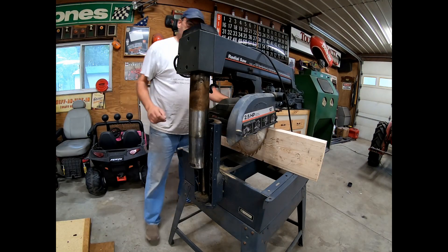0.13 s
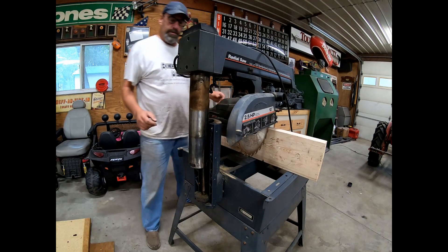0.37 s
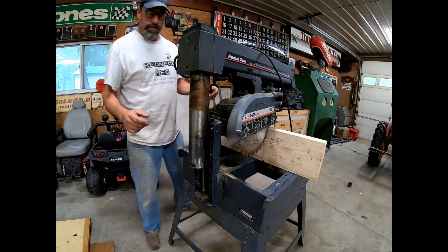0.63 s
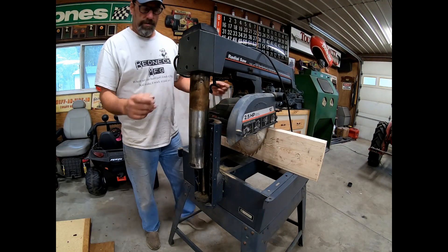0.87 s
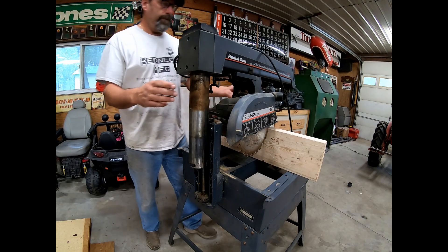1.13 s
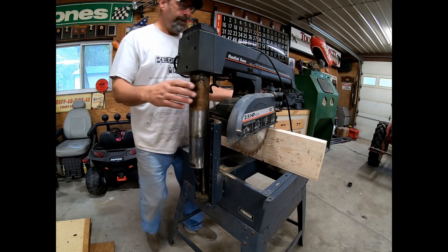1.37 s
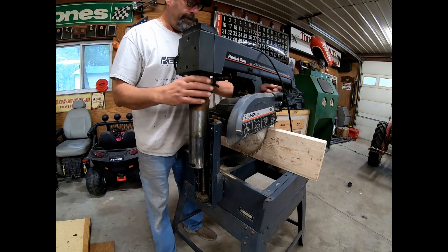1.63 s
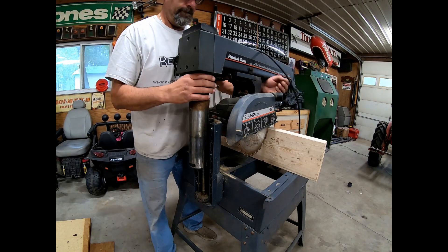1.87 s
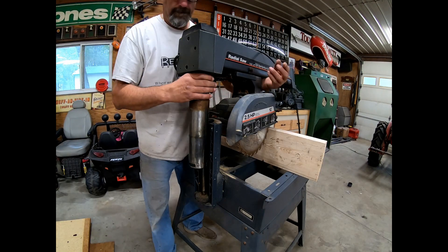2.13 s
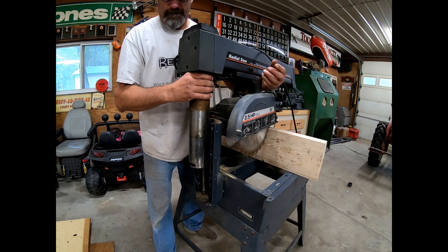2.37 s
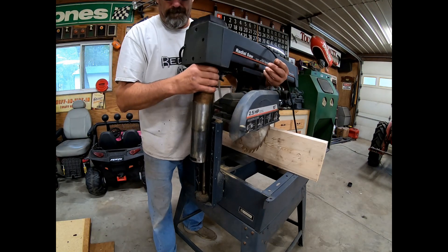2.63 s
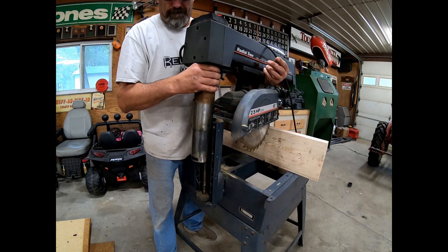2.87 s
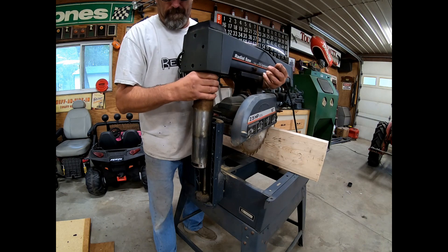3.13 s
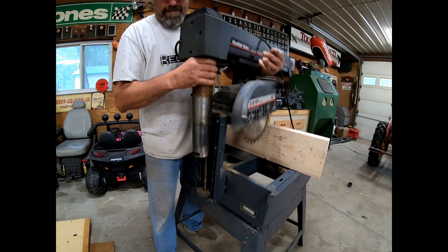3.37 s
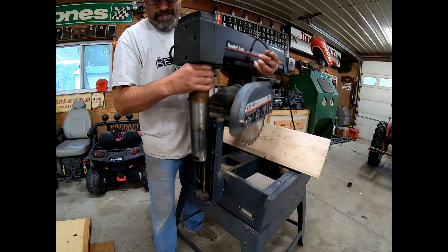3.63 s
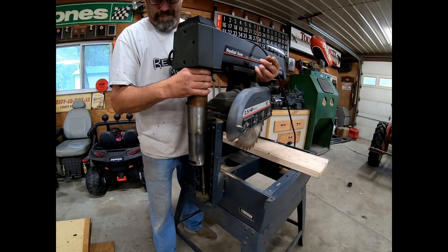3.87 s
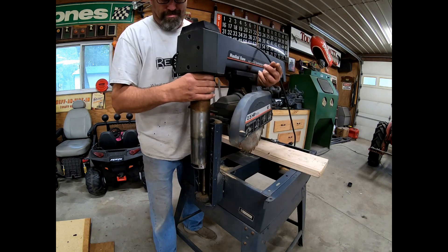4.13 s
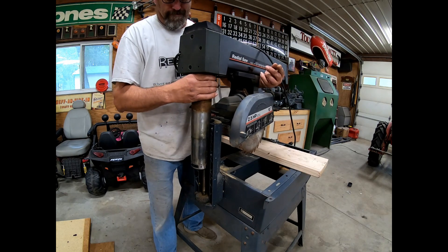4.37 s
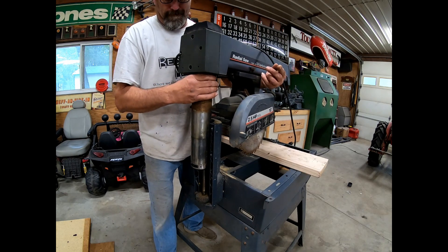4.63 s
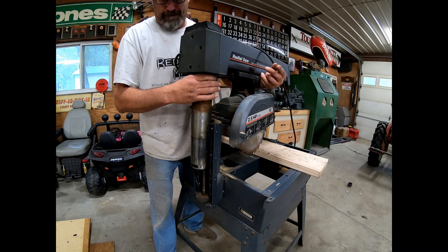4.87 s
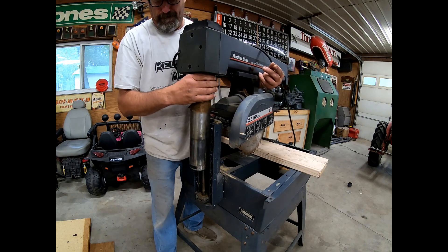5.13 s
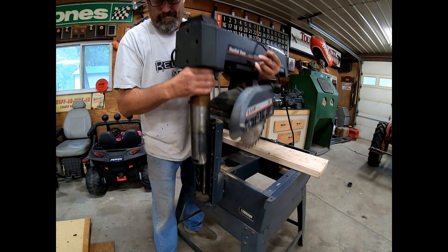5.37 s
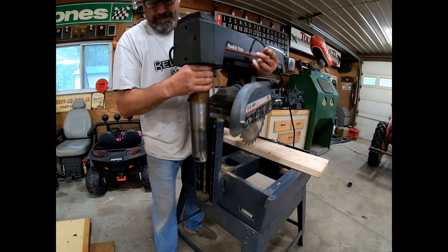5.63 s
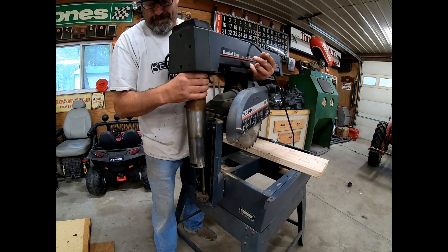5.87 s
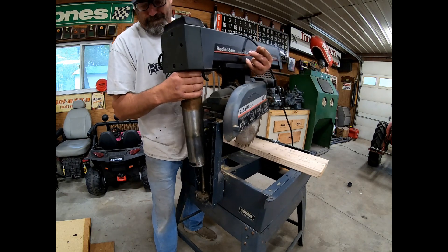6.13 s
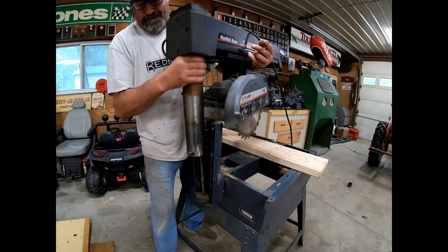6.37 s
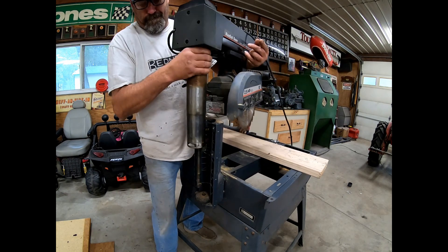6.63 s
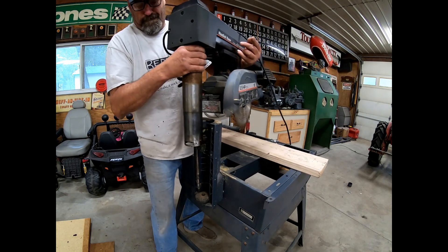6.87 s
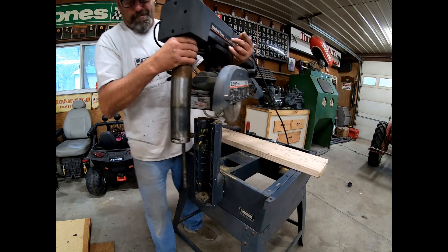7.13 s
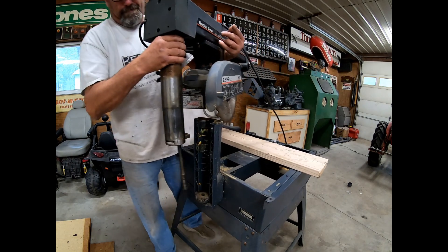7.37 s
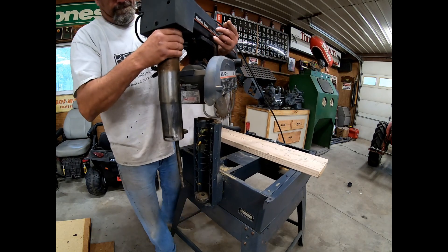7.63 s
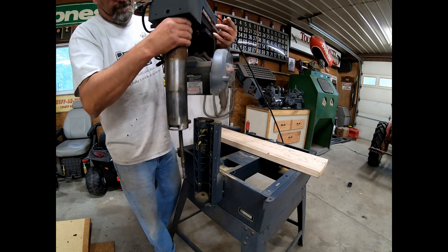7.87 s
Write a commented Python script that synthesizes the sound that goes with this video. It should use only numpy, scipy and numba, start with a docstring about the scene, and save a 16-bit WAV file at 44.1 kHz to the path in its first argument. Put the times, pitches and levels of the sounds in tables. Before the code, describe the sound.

Heavy metal on metal at close range in a big workshop. A small scrape and knock come first, then a lull. Short damped clacks and gritty stick-slip scraping build to a loud bang, with the stand's thin steel booming below. After a second's lull the shoving resumes in irregular jerks, easing into smaller scrapes, a tiny tinkle and a thin blade ring. Garage echo, soft air noise and hum surround it.

```python
"""First a dull scrape and a soft boom of sheet steel, then a knock: a heavy cast saw arm is wrestled off
its column in a large garage, two metres from a small camera. Knocks and scrapes are noise impacts that ring
the cast arm; the stand booms as wobbling tones, and near the end the saw blade rings as decaying sines.
Fading noise makes the garage echo, over steady air noise and a low hum; the camera's gain control turns
down in loud moments and recovers slowly."""
import sys
import numpy as np
from scipy import signal
from scipy.fft import rfft, irfft
from scipy.io import wavfile
from scipy.ndimage import uniform_filter1d
from numba import njit

SR = 44100
rng = np.random.default_rng(int(sys.argv[2]) if len(sys.argv) > 2 else 0)


def bounce(signal):
    """Save signal as a 16-bit WAV file at the path given by the first command-line argument."""
    frames = np.transpose(np.atleast_2d(signal))
    limited = np.clip(frames, -1, 1)
    pcm = np.round(limited * 32767).astype(np.int16)
    wavfile.write(sys.argv[1], SR, pcm)


def field_ratio(decibels):
    """Amplitude ratio for a level in dB (20 dB per decade); scalars and array-likes work."""
    return 10 ** (np.asarray(decibels, dtype=float) / 20)


N = 352800
T = np.arange(N) / SR

# sliding contact, one curve per shove of the arm:
# t/s, scrape level/dB, dull part level/dB re scrape, grit hiss level/dB re scrape
SHOVES = [
    [(0.0, -33, 4, -9), (0.018, -34, 1.5, -11.5), (0.272, -58, 7, -22), (0.282, -55, 4, -10),
     (0.29, -26.5, -12, -10.5), (0.372, -53.5, 9.5, -17), (0.556, -56, -6, -17), (0.6, -56, -11, -17)],
    [(1.35, -66, -8, -9), (1.484, -72, 1, -10), (1.592, -66, -15, -14), (1.642, -48.5, -14, 6),
     (1.694, -59, 3, -9), (1.908, -55.5, 3.5, -16), (2.078, -65, -5, -3), (2.4, -54.5, -2, -26)],
    [(2.48, -63, 16, -13), (2.514, -68, 8, -18), (2.528, -29.5, -9, -36), (2.546, -40, 3, -21),
     (2.74, -37, 5, -12), (2.766, -18.5, -3, -17), (2.796, -27.5, 3.5, -14.5), (3.1, -45, 1, -18)],
    [(3.1, -42, 5, -14), (3.114, -28, 4.5, -16), (3.178, -55, 18, -21), (3.24, -21, 0.5, -18),
     (3.26, -18, -4, -16), (3.318, -23.5, -3.5, -8.5), (3.44, -15.5, 0.5, -12.5), (3.7, -34.5, 3, -16)],
    [(3.7, -48, 0, -16), (3.762, -25, -8, -11), (3.8, -15, -5.5, -18.5), (3.894, -29, 9, -11),
     (3.914, -21, -11, -18), (3.96, -14.5, -0.5, -10.5), (4.17, -20, -1, -12), (4.6, -70, 13, -29)],
    [(5.3, -90, -1, -17), (5.39, -36.5, -3, -17), (5.412, -52, -6, -21), (5.442, -23.5, -3, -16),
     (5.466, -22.5, -6, -20), (5.49, -20, -6, -5), (5.508, -16.5, 3, -9), (5.7, -28, 1, -14)],
    [(5.7, -30, -11, -16), (5.714, -36, 11, -11), (5.74, -30, 2, -14), (5.756, -16, -4.5, -7),
     (5.788, -15.5, -2.5, -21), (5.878, -22.5, 3, -10), (6.124, -54.5, 3, -24), (6.25, -36, 2, -21)],
    [(6.25, -43, 8, -19), (6.288, -32, -3, -24), (6.306, -21.5, -2, -7), (6.366, -22.5, 6.5, -9.5),
     (6.456, -15.5, 1, -13), (6.65, -32, 2, -17.5), (6.654, -31, 1, -33), (6.75, -44, 10, -24)],
    [(6.75, -30, 5.5, -21), (6.868, -38, 7.5, -24), (6.886, -28, 1, -3), (6.918, -30.5, 2, -27),
     (7.002, -28, 1, -16), (7.022, -21, -4, -23), (7.038, -36, 8.5, -14), (7.2, -53, 12, -23)],
    [(7.2, -59, -8, -24), (7.246, -56, 6, -11), (7.326, -18, 1, -14.5), (7.484, -40.5, 6, -13),
     (7.534, -37, 13, -12), (7.61, -41.5, -4, 0.5), (7.728, -41, -1.5, -3.5), (8.0, -59, 5, -25)],
]
# modes of the cast arm left free: f/Hz, level/dB, t60/s
ARM_MODES = [(690, -5, 0.039), (929, 1, 0.04), (1019.5, 2.5, 0.046), (1180, -11, 0.098), (1350, 12, 0.0057),
             (1650, -19.5, 0.004), (2030, -11, 0.042), (2460, -1, .03), (2700, 0, 0.031), (2780, -2, 0.024),
             (3060, -1, 0.022), (3560, 3, 0.02), (4260, -15.5, 0.03), (5000, -7, 0.02), (6350, -4, 0.037),
             (7840, -1.5, 0.03), (8330, -33.5, 0.021)]
# broad colour of the casting: f/Hz, level/dB
CASTING_COLOUR = [(53, -37.5), (90, -17), (113, -16), (155, -12.5), (272, -13.5), (336, -7), (504, -11),
                  (781, -13), (948, -13.5), (1050, -8), (2920, -13), (4950, -17), (6000, -23.5),
                  (7800, -56), (13200, -120)]
# colour of fine grit: f/Hz, level/dB
GRIT_COLOUR = [(2650, -15.5), (4500, 0), (4970, 1), (6140, -8), (6990, -6.5), (7730, -3), (9220, -6.5),
               (12300, -26), (14900, -42)]
HELD_DAMPING = 0.6  # factor on t60: hands on the arm shorten its ring


def at(table, hz):
    """Read a (f/Hz, value) table on a log-frequency axis."""
    f, v = np.transpose(table)
    return np.interp(np.log(np.maximum(hz, 1)), np.log(np.maximum(f, 1)), v)


def colour(x, table):
    """Causal filter with the given (f/Hz, level/dB) shape, from the folded cepstrum."""
    cep = irfft(np.log(field_ratio(at(table, np.fft.rfftfreq(4096, 1 / SR)))))
    cep[1:2048] *= 2
    cep[2049:] = 0
    response = irfft(np.exp(rfft(cep)))
    return signal.oaconvolve(x, response)[:len(x)]


def split(x, hz):
    """The parts below and above a frequency."""
    return [signal.sosfilt(signal.butter(3, hz, kind, fs=SR, output="sos"), x) for kind in ("low", "high")]


def level(x, db):
    """Scale to an rms level."""
    return x * field_ratio(db) / np.sqrt(np.mean(x ** 2))


def ring(modes, seconds):
    """Response of a body to one tap: each mode is a decaying sine."""
    hz, db, t60 = np.transpose(modes)[:, :, None]
    t = np.arange(int(seconds * SR)) / SR
    decay = np.exp(-np.log(1000) * t / t60)
    return np.sum(field_ratio(db) * decay * np.sin(2 * np.pi * hz * t), axis=0)


def grains(spread_db, count):
    """Dense small impacts of very unequal size."""
    return rng.standard_normal(count) * field_ratio(spread_db * rng.exponential(size=count))


def walk(rate):
    """Random levels, a new one every 1 / rate s, joined by slopes; spread near 1."""
    k = int(SR / rate)
    return 1.06 * uniform_filter1d(np.repeat(rng.standard_normal(N // k + 1), k), k)[:N]


def add(track, s, sound):
    """Mix a sound in at time s."""
    i = int(s * SR)
    track[i:i + len(sound)] += sound[:N - i]


def curves(tables):
    """Columns at every sample; the first is silent in the gaps between tables."""
    rows = []
    for table in tables:
        if rows and table[0][0] - rows[-1][0] > 0.05:
            rows.append((rows[-1][0] + 0.01, -99, *rows[-1][2:]))
            rows.append((table[0][0] - 0.01, -99, *table[0][2:]))
        rows += table
    s, *columns = np.transpose(rows)
    return [np.interp(T, s, c) for c in columns]


def knocks():
    """Metal on metal: a sharp first contact and a dying rattle give a bright clack, a dull body and a tick."""
    # t/s, clack peak level/dB, dull body level/dB, tick level/dB, clack pitch f/Hz, rattle decay time/s
    knock_table = [(0.2874, -25, -27.5, -53, 1030, 0.045), (2.4386, -57, -40.5, -92, 1180, 0.0086),
                   (2.5265, -30.5, -28, -76, 2680, 0.018), (2.601, -47, -29, -45.5, 1465, 0.024),
                   (2.6053, -19, -45, -62, 1250, 0.072), (2.6996, -15, -29, -41, 2880, 0.0054),
                   (2.746, -14.5, -19, -41.5, 1110, 0.0078), (2.762, -13.5, -15, -30.5, 2240, 0.0071),
                   (3.1155, -16.5, -23, -57, 1860, 0.0092), (3.1846, -20, -37, -64, 3400, 0.042),
                   (3.234, -19.5, -34, -43.5, 974, 0.018), (3.2538, -8, -10.5, -18, 960, 0.045),
                   (3.391, -5, -16, -36, 2620, 0.007), (3.438, -11, -18, -27, 1310, 0.027),
                   (3.5743, -20, -29, -47, 902, 0.012), (3.7315, -15, -34, -38.5, 1990, 0.03),
                   (3.7457, -9, -36, -25.5, 1970, 0.021), (3.907, -0.5, -4.5, -16.5, 910, 0.01),
                   (5.374, -29.5, -30.5, -73, 1100, 0.03), (5.4224, -24, -41, -66, 2610, 0.012),
                   (5.434, -20.5, -14, -46, 902, 0.011), (5.4846, -5, -16, -35, 902, 0.015),
                   (5.75, -9, -32, -18, 1540, 0.0102), (6.202, -35, -28, -60, 1290, 0.013),
                   (6.3026, -5, -38, -53, 2850, 0.044), (6.3233, -12, -32, -24, 1180, 0.01),
                   (6.348, -24, -23, -42, 3700, 0.012), (6.4384, -7, -22, -31.5, 1320, 0.0054),
                   (6.6565, -10.5, -27, -70, 1640, 0.0049), (6.7254, -25, -22.5, -52, 2650, 0.018),
                   (6.769, -20, -27, -41, 969, 0.011), (6.8813, -8.5, -40, -53, 3120, 0.009),
                   (7.0176, -19.5, -17.5, -39, 1360, 0.018), (7.038, -36, -22, -48, 1550, 0.015),
                   (7.101, -36, -39, -49, 940, 0.013), (7.28, -16, -30, -48, 1250, 0.024),
                   (7.3107, -14.5, -19, -30.5, 3540, 0.021), (7.521, -16, -24, -43, 990, 0.015),
                   (7.7008, -25.5, -31.5, -33, 3900, 0.033)]
    contact_s = 0.0018  # rise of a knock
    out, size = np.zeros(N), SR // 6
    t = np.arange(size) / SR
    head = slice(0, 900)  # the first 20 ms set the level
    for s, clack_db, body_db, tick_db, pitch_hz, decay_s in knock_table:
        envelope = np.exp(-t / decay_s) + 0.13 * np.exp(-t / 0.0008)
        rattle = grains(1.6, count=size) * envelope
        rattle = rattle * (1 - np.exp(-(t / contact_s) ** 2))
        # modes near the pitch of the struck spot ring loudest
        spot = []
        for hz, db, t60 in ARM_MODES:
            struck_hz = hz * (1 + 0.016 * rng.standard_normal())
            struck_db = db - 27.0 * min(abs(np.log2(hz / pitch_hz)), 1.5)
            spot.append((struck_hz, struck_db, HELD_DAMPING * t60))
        cast = level(colour(rattle, CASTING_COLOUR), 0)
        rung = level(signal.oaconvolve(rattle, ring(spot, 0.07))[:size], 1.1)
        body, clack = split(cast + rung, 1476)
        tick = colour(rattle * np.exp(-t / 0.0044), GRIT_COLOUR)
        # the peaks stand well above the level of the first 20 ms
        for part, db in ((clack, clack_db - 13.5), (body, body_db - 11.0), (tick, tick_db - 4.5)):
            add(out, s, part * field_ratio(db) / np.sqrt(np.mean(part[head] ** 2)))
    return out


def wandering(force):
    """The arm's modes, as resonators under a moving contact: each swells and fades on its own."""
    shift_db, shifts_per_s = 8.5, 18
    out = 0
    for hz, db, t60 in ARM_MODES:
        r = field_ratio(-60 / (HELD_DAMPING * t60 * SR))
        w = 2 * np.pi * hz / SR
        push = force * field_ratio(db + shift_db * walk(shifts_per_s))
        out = out + signal.lfilter([0, r * np.sin(w)], [1, -2 * r * np.cos(w), r * r], push)
    return out


def slides():
    """Uneven stick and slip drives the casting, its modes and a fine grit hiss."""
    scrape_db, dull_db, hiss_db = curves(SHOVES)
    catch = field_ratio(2.44 * walk(45))
    slips = catch * grains(2.4, count=N)
    metal = level(colour(slips, CASTING_COLOUR), 0) + level(wandering(slips), -7.0)
    dull, rest = split(metal, 974)
    middle, bright = split(rest, 3480)
    grit = colour(catch * grains(3.3, count=N), GRIT_COLOUR)
    hiss = split(grit, 4100)[1]
    # the bright part of the scrape follows the grit, 11 dB lower
    parts = (middle, 0), (dull, dull_db), (bright, hiss_db - 11), (hiss, hiss_db)
    return sum(level(x, -3.0) * field_ratio(scrape_db + db) for x, db in parts)


def stand():
    """Sheet-steel modes swell at a jolt, die away and hum along with the scrape; pitch and size wobble."""
    # three tray modes, legs, side panels, shelf, crossbar: f/Hz, pitch wobble/Hz, wobble rate/(1/s)
    stand_modes = [(218.8, 8.96, 30), (252.8, 10.3, 30), (286.1, 8, 30), (81, 16.8, 18), (163.9, 2.5, 10),
                   (537.3, 3.03, 16), (116.9, 10.15, 17)]
    # ring time of each mode: t60/s
    stand_t60 = [.22, .22, .26, .35, 1.0, .5, .25]
    # hum of each mode under the scrape: level/dB re the dull scrape
    shake_table = [-8.5, -9.5, -9.5, -22.5, -20, -31, -17.5]
    # jolts: t/s, tray level/dB, tray pitch f/Hz, legs level/dB, side panels level/dB, shelf level/dB
    jolt_table = [(0.014, -35.5, 282, -32.5, -52, -40), (0.209, -53, 213, -40, -49, -53),
                  (0.349, -58, 220, -41, -69, -60), (2.62, -24, 260, -80, -64, -40),
                  (2.76, -18.5, 294, -27, -30.5, -29.5), (3.026, -27.5, 240, -34, -44, -42),
                  (3.12, -26, 293, -48, -58, -49), (3.209, -22.5, 285, -44, -41, -30),
                  (3.241, -15, 252, -36, -31, -29), (3.403, -11.5, 254, -18, -23, -30),
                  (3.499, -17, 254, -34, -25.5, -31), (3.619, -47, 213, -32, -49, -42),
                  (3.797, -14, 304, -33, -40, -28), (3.915, -8.5, 265, -18.5, -19.5, -23),
                  (3.979, -12.5, 215, -34, -24, -22), (4.046, -17, 264, -43, -38, -18.5),
                  (4.109, -21, 266, -46, -42, -19.5), (4.17, -23, 295, -49, -42, -37),
                  (4.399, -32.5, 264, -59.5, -54, -43), (5.07, -45.5, 264, -51.5, -54, -63),
                  (5.396, -35, 237, -53, -55, -36), (5.49, -10, 257, -27, -23.5, -33),
                  (5.58, -19, 209, -50, -27, -41), (5.669, -23, 286, -52, -39, -39),
                  (5.822, -21, 245, -48, -29.5, -35), (5.949, -28, 256, -41, -31.5, -40),
                  (6.197, -30, 280, -53, -42, -40), (6.329, -13, 280, -27, -33, -38),
                  (6.369, -17, 288, -33, -28, -41), (6.429, -17.5, 277, -42, -26.5, -40),
                  (6.524, -19.5, 294, -51, -42, -28), (6.719, -24, 273, -39, -33, -37),
                  (6.768, -24.5, 294, -39, -52, -43), (6.89, -23.5, 268, -50, -34, -43),
                  (7.01, -24.5, 288, -41, -26.5, -30), (7.129, -36, 211.2, -47, -34.5, -36),
                  (7.291, -20.5, 245, -33.5, -35, -29), (7.379, -29, 248, -42, -25.5, -39),
                  (7.539, -26, 231, -54, -38, -52), (7.599, -33, 260, -57, -40, -52),
                  (7.705, -30, 272, -64, -53, -42), (7.819, -38, 252, -73, -56.5, -61)]
    rise_s, tray_fall_db_per_octave = 0.004, 36.5
    s, tray_db, tray_hz, *frame_db = np.transpose(jolt_table)
    # tray modes away from the jolt's pitch ring less
    mode_db = [tray_db - tray_fall_db_per_octave * np.abs(np.log2(hz / tray_hz)) for hz, *_ in stand_modes[:3]]
    crossbar_db = frame_db[0] - 11  # it moves with the legs
    mode_db += frame_db + [crossbar_db]
    scrape_db, dull_db, _ = curves(SHOVES)
    t, out = T[:SR // 2], 0
    for (hz, wobble_hz, rate), db, t60, shake_db in zip(stand_modes, mode_db, stand_t60, shake_table):
        power = field_ratio(2 * (scrape_db + dull_db + shake_db))
        swell = ((1 - np.exp(-t / rise_s)) * field_ratio(-60 * t / t60)) ** 2
        for when, jolt_db in zip(s, db):
            add(power, when, field_ratio(2 * jolt_db) * swell / swell.max())
        phase = 2 * np.pi * np.cumsum(hz + wobble_hz * walk(rate)) / SR
        out = out + np.sqrt(power) * field_ratio(1.87 * walk(rate)) * np.sin(phase)
    return out


def tapped(modes, s, db):
    """One soft-edged tap at time s on a body with the given modes."""
    out, tone = np.zeros(N), ring(modes, 0.5)
    rise = 1 - np.exp(-T[:len(tone)] / 0.0083)
    add(out, s, field_ratio(db) * tone * rise)
    return out


def blade():
    """The toothed steel disc is brushed near the end and rings on in many modes."""
    # f/Hz, level/dB, t60/s
    blade_modes = [(1954, 0, 0.83), (2562, 0, 5.0), (3230, -5, 0.94), (3585, -6, 0.71), (3892, -3, 1.9),
                   (4048, -7, 1.3), (4506, -2, 1.4), (4727, -11, 0.93), (5044, -8, 0.58), (5464, -10, 0.5),
                   (5868, -14, 0.75), (7757, -5, 0.48), (9022, -11, 0.37), (10680, -21, 0.23),
                   (11310, -22, 0.18), (11670, -29, 0.29)]
    return tapped(blade_modes, s=7.705, db=-42)


def loose_part():
    """A small loose part tinkles once, in two high modes."""
    # f/Hz, level/dB, t60/s
    part_modes = [(6140, 1, .07), (8810, -1, 0.061)]
    return tapped(part_modes, s=7.088, db=-28)


def brushes():
    """A hand or sleeve brushes past: soft swells of rubbing, a middle swish and a bright rustle."""
    # start t/s, length/s, swish level/dB, rustle level/dB
    brush_table = [(1.44, 0.034, -62, -57), (1.617, 0.065, -42.5, -53)]
    out = np.zeros(N)
    for s, length_s, swish_db, rustle_db in brush_table:
        size = int(length_s * SR)
        rub = grains(1.3, count=size) * np.hanning(size) ** 0.3
        above = split(rub, 1100)[1]
        swish = split(above, 3600)[0]
        rustle = colour(rub, GRIT_COLOUR)
        add(out, s, level(swish, swish_db) + level(rustle, rustle_db))
    return out


def shaded(x):
    """The far port hears the sound a little late, its treble scattered round the camera body."""
    late = np.roll(x, 2)  # samples
    low = signal.sosfiltfilt(signal.butter(4, 6000, fs=SR, output="sos"), late)
    scatter = rng.standard_normal(200) * np.exp(-T[:200] / 0.0012)
    scatter = scatter / np.sqrt(np.sum(scatter ** 2))
    return low + signal.oaconvolve(late - low, scatter)[:N]


def diffuse(make):
    """Sound from all around: the ports agree in the bass and differ in the treble."""
    # f/Hz, side level/dB re mid
    side_colour = [(60, -17.5), (110, -15.5), (200, -22), (370, -22), (690, -3.5), (1260, -0.5),
                   (2320, -2.5), (4270, -4.5), (7860, 0.5), (14500, 0.5)]
    mid, side = make(), colour(make(), side_colour)
    return np.array([mid + side, mid - side])


def garage():
    """One echo pattern of the room: octave bands of noise, each with its own decay, unit energy."""
    # f/Hz, t60/s
    garage_t60 = [(60, 0.35), (250, 0.99), (1000, 0.96), (3000, 1), (6000, 0.88), (12000, 0.19)]
    t, tail = np.arange(SR) / SR, 0
    for lo in 45 * 2.0 ** np.arange(9):
        band = signal.butter(2, [lo, min(2 * lo, 0.45 * SR)], "band", fs=SR, output="sos")
        t60 = at(garage_t60, lo * np.sqrt(2))
        noise = signal.sosfilt(band, rng.standard_normal(SR))
        tail = tail + noise * np.exp(-np.log(1000) * t / t60) / np.sqrt(t60)
    tail = tail * (1 - np.exp(-(t / 0.0024) ** 2))
    return tail / np.sqrt(np.sum(tail ** 2))


def air():
    """Steady broad noise of the building whose level wanders a little."""
    # f/Hz, level/dB
    air_colour = [(15, -66), (25, 5), (39, -2), (59, 5), (144, -11.5), (183, 3), (237, -1.5), (351, -6.5),
                  (520, -10), (950, -13.5), (2250, -13.5), (5340, -33), (6090, -41), (8550, -41.5),
                  (13000, -67.5)]
    return colour(field_ratio(0.9 * walk(2.1)) * rng.standard_normal(N), air_colour)


def hum():
    """A low tone in the building that wavers in pitch and size."""
    hum_hz, hum_db = 57.7, -57
    size = field_ratio(hum_db + 2.5 * walk(9.8))
    return size * np.sin(2 * np.pi * np.cumsum(hum_hz + 3 * walk(8)) / SR)


def scene():
    """Direct sound of the work, echo of metal and stand, air and hum, at the camera's two ports."""
    # the camera body shades the left port: f/Hz, left level/dB re right
    left_minus_right = [(60, 0.0), (110, 0.0), (200, 0.0), (370, 0.0), (690, -1.0), (1260, -3.0),
                        (2320, -4.0), (4270, -1.5), (7860, -2.0), (14500, -7.5)]
    metal, boom = knocks() + slides() + brushes(), stand()
    # the long-ringing stand already fills the space, so its echo adds less
    sent = metal + field_ratio(-10.0) * boom
    echo = np.array([signal.oaconvolve(sent, tail)[:N] for tail in diffuse(garage)])
    work = metal + boom + blade() + loose_part()
    direct = np.array([shaded(work), work])
    heard = direct + field_ratio(-3.5) * echo + level(diffuse(air), -50.5) + hum()
    ports = []
    for x, sign in zip(heard, (1, -1)):
        half = [(hz, sign * db / 2) for hz, db in left_minus_right]
        ports.append(colour(x, half))
    return np.array(ports)


@njit
def follow(x, start, attack, release):
    """Level follower that rises fast and falls slowly."""
    e, out = start, np.empty(len(x))
    for i in range(len(x)):
        e += (x[i] - e) * (attack if x[i] > e else release)
        out[i] = e
    return out


def top_cut(x):
    """Nothing passes above the cut-off."""
    return signal.sosfilt(signal.butter(12, 15060, fs=SR, output="sos"), x)


def record(dry):
    """A bass cut; gain control lifts quiet stretches slowly and drops fast on loud ones; peaks are rounded."""
    attack_s, release_s = 0.0089, 0.55
    dry = signal.sosfilt(signal.butter(2, 45, "high", fs=SR, output="sos"), dry)
    peak = np.abs(dry).max(axis=0)
    loud = follow(peak, float(field_ratio(-34.0)), 1 / (attack_s * SR), 1 / (release_s * SR))
    gain_db = np.clip(-0.3 * (20 * np.log10(loud) + 17), -6.0, 8.0)
    mix = np.tanh(dry * field_ratio(gain_db))
    return top_cut(mix)


dry = scene()
out = record(dry)
bounce(out)
```